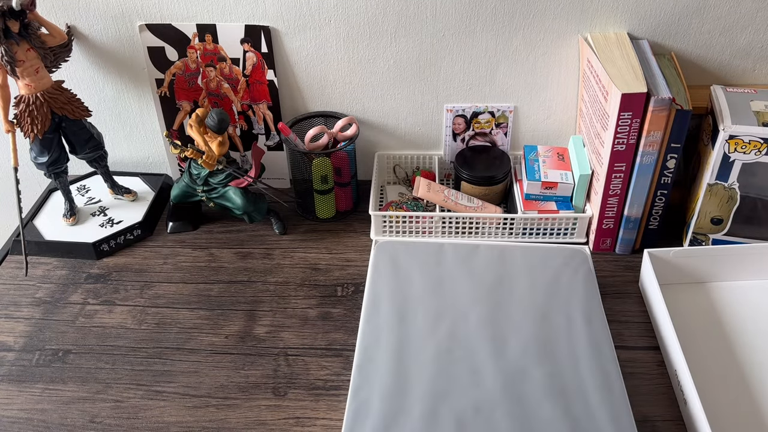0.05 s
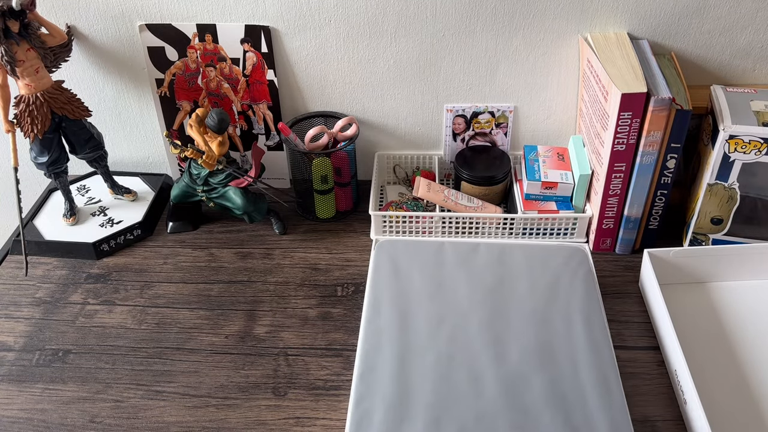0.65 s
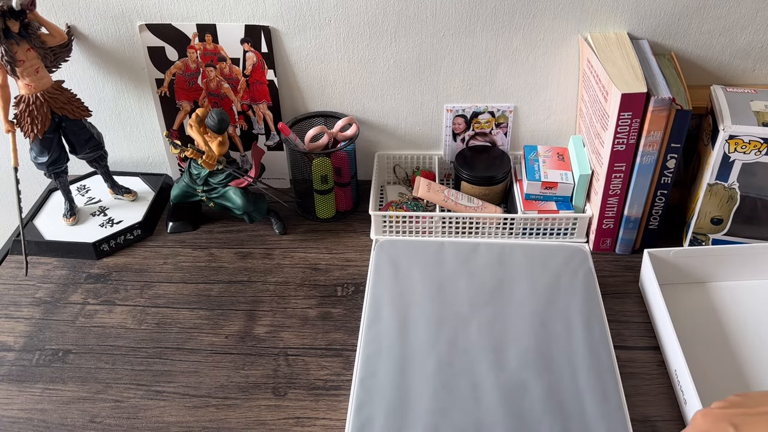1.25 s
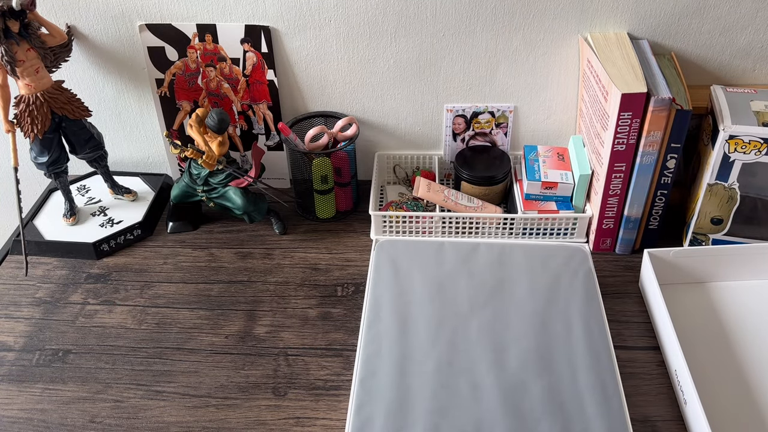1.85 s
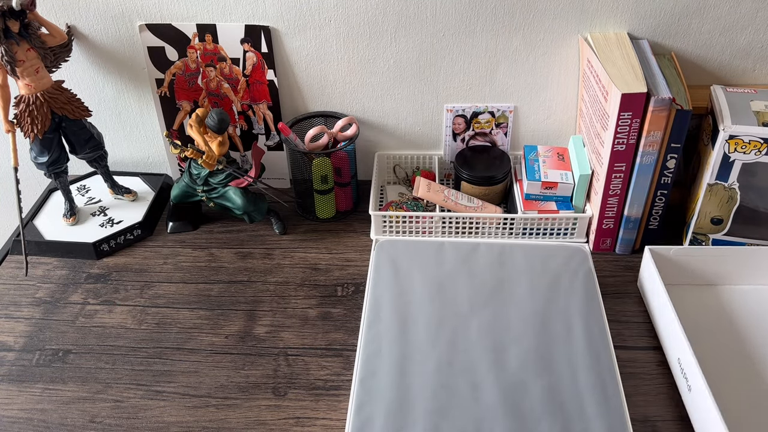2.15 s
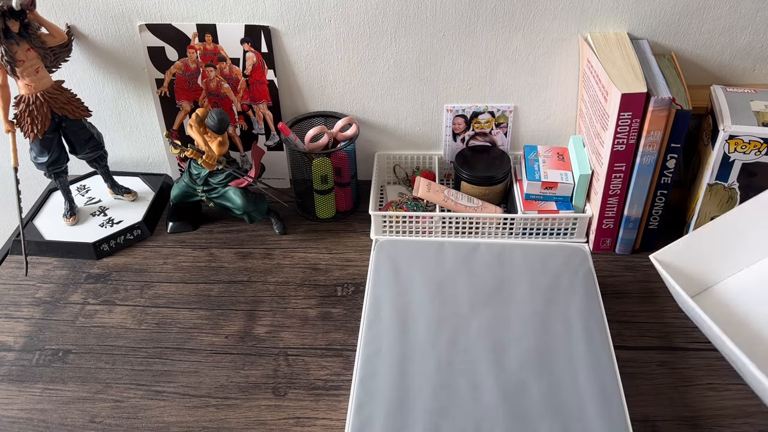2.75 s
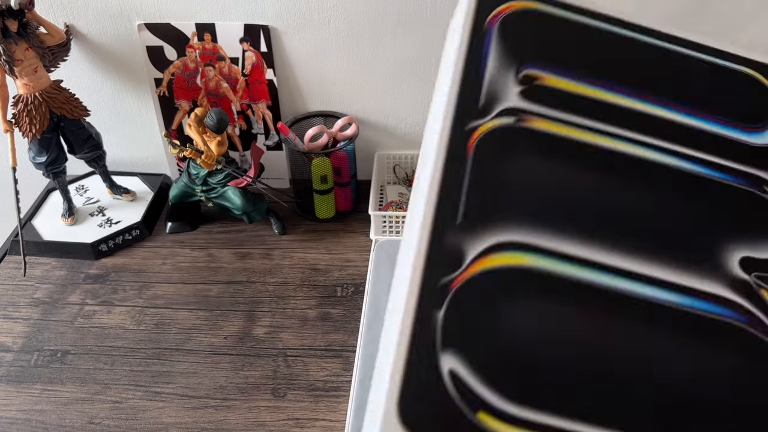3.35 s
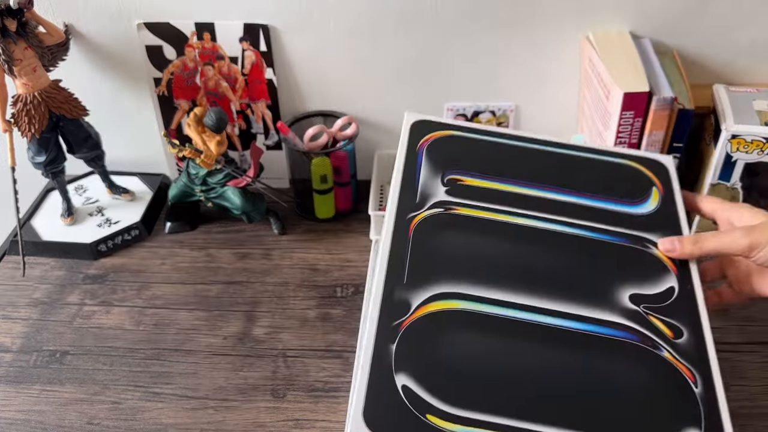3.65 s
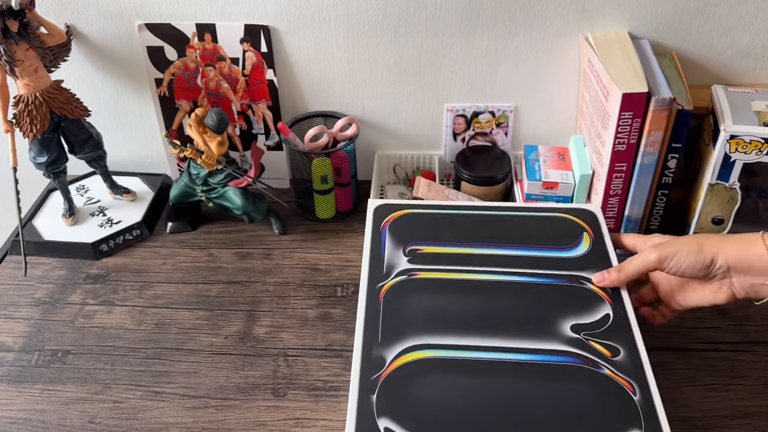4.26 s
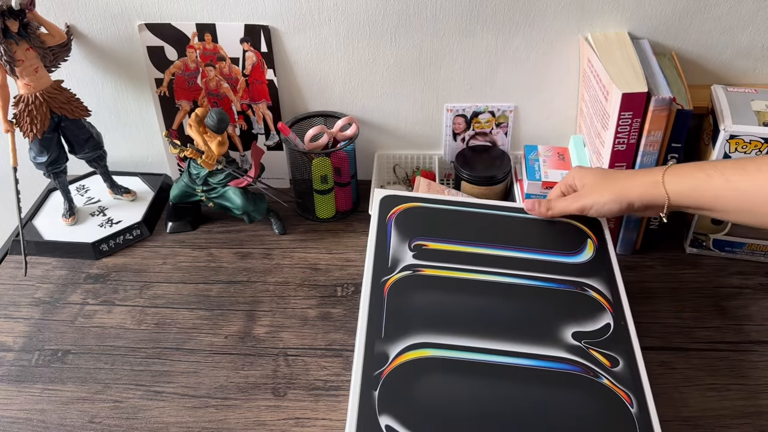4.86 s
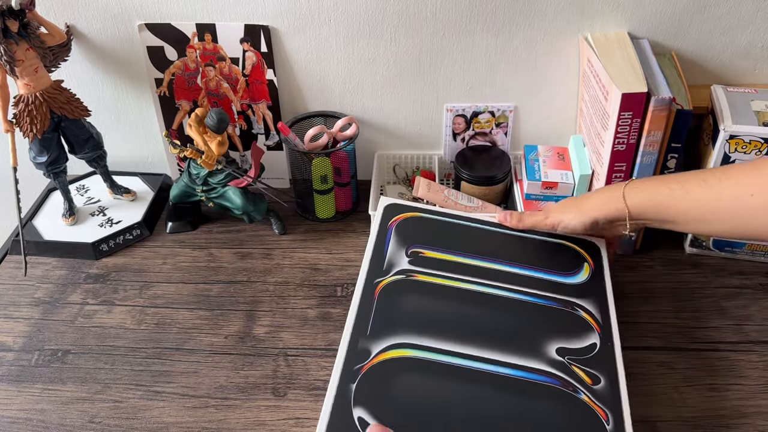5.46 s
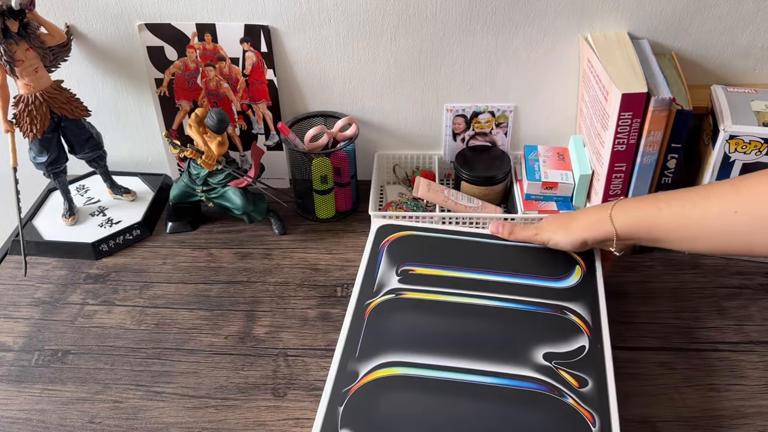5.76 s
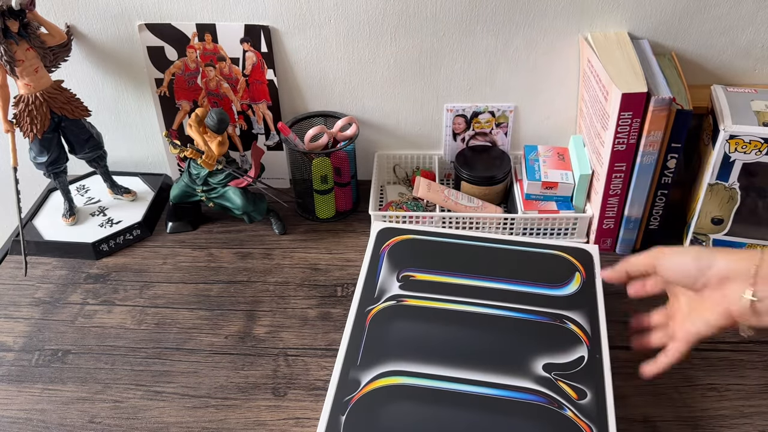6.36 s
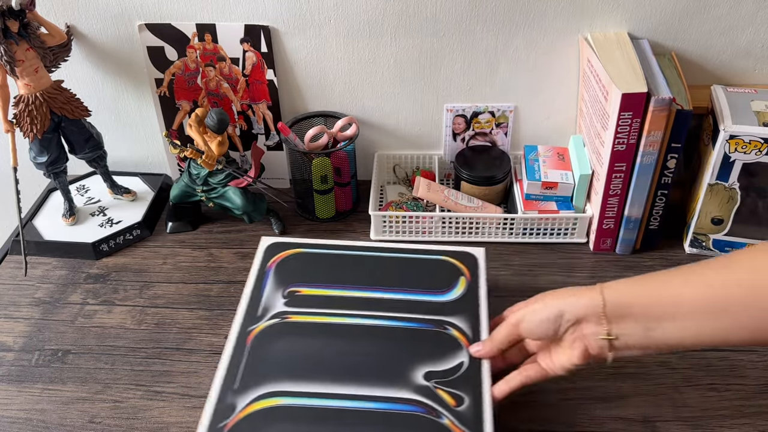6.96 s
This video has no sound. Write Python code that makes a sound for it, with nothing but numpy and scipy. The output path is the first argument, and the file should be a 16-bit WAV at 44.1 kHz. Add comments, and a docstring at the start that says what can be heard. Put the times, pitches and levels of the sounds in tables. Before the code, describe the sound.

Close to a phone microphone in a small, quiet room, a cardboard box is handled on a wooden desk. Soft finger scuffs and nail clicks come first, then hollow knocks as the lid is picked up and placed on the base. Card hisses against card as the lid slides down, ending in two dull thuds. The box then slides over the wood with a scrape, a low drone and crisp gritty ticks.

```python
"""A stiff cardboard box lid is picked up from a wooden desk, knocked, and set on its base.
Every blow rings the hollow of the box, its panels and its rims; fingers rub, tap and click on the card.
The lid sinks with a hiss of rubbing card and escaping air, and seats with two thuds.
Then the box is pushed across the desk, scraping and droning, with grit ticking under it.
All of it is close to a phone in a small room."""
import sys
import numpy as np
from scipy import signal
from scipy.fft import rfft, irfft, next_fast_len
from scipy.io import wavfile
from scipy.ndimage import uniform_filter1d

SR = 44100
rng = np.random.default_rng(int(sys.argv[2]) if len(sys.argv) > 2 else 0)


def unload_audio(sound):
    """Save the sound as a 16-bit wav file, at the path given as the first command line argument."""
    columns = np.transpose(np.atleast_2d(sound))
    # keep every value between -1 and 1, then stretch to whole-number steps
    steps = np.round(np.clip(columns, -1, 1) * 32767)
    wavfile.write(sys.argv[1], SR, steps.astype(np.int16))


N = 313048
TIME_S = np.arange(N) / SR
RING_S = np.arange(SR // 2) / SR

# Steady hiss. Each row: frequency in Hz, left gain in dB, right gain in dB.
ROOM_HISS = [(860, -21, -57), (1390, -7.5, -37), (1747, 3, -52.5), (1915, 5.5, -17.5), (2100, 5.5, -38),
             (2574, -10.5, -33), (3350, -16, -45.5), (4600, -14, -23.5), (5130, -28, -41.5),
             (8500, -26.5, -44), (10800, -76, -48)]
# Finger scuffs. Each row: start in seconds, length in seconds, hiss in dB, body in dB.
RUBS = [(0.154, 0.085, -52.5, -71), (0.274, 0.084, -62, -64), (0.368, 0.055, -55.5, -85),
        (0.454, 0.23, -68, -60), (0.663, 0.048, -50, -65), (0.729, 0.098, -70, -64),
        (2.482, 0.071, -56, -70), (2.565, 0.051, -65, -59), (2.628, 0.11, -59, -74),
        (2.752, 0.05, -59, -69), (4.38, 0.036, -53.5, -71), (4.582, 0.027, -63, -66.5),
        (4.848, .1, -57.5, -71), (5.076, 0.036, -62, -60), (5.999, 0.15, -71, -60.5),
        (6.4, 0.18, -69.5, -64.5)]
# Nail clicks. Each row: start in seconds, level in dB, pitch in Hz.
NAIL_SNAPS = [(0.2202, -54.5, 4230), (0.2207, -56, 9100), (0.4515, -53.5, 1550), (0.4928, -55.5, 1690),
              (2.1195, -72, 4900), (3.812, -58, 3120)]
# Finger taps. Each row: start in seconds, relative strength, hardness and tick in dB, panel pitch in Hz.
FINGER_TAPS = [(0.258, -53, 4, -71, 293), (0.454, -50.5, -7.5, -53, 260), (0.493, -55.5, 0, -53.5, 447),
               (0.548, -54.5, -6, -58.5, 354), (0.631, -57.5, -11, -64, 557), (1.240, -61, 5.5, -59.5, 613),
               (1.495, -69, -1, -59, 460), (2.556, -55, 6, -62, 570), (2.77, -58, 6, -62, 575),
               (2.937, -57.5, 16.5, -53.5, 596), (2.963, -53, 4, -80, 594), (3.477, -50.5, -3.5, -61, 295),
               (3.559, -66.5, 12, -60, 330), (3.748, -51, -1.5, -56.5, 640), (3.899, -64.5, -6.5, -67, 433),
               (4.339, -51.5, 0.5, -65, 464), (5.184, -48, -1, -83, 448), (5.251, -51, 1, -55.5, 392),
               (6.117, -53, 2.5, -56.5, 550)]
# Box and desk-top modes. Each row: frequency in Hz, relative level in dB, t60 in seconds.
BOX_MODES = [(96.7, -12.5, 0.53), (127.5, -11, 0.6), (141.1, 0.5, 0.21), (171.7, -3.5, 0.25),
             (214, 0.5, 0.12), (272.3, 0, 0.086), (327.2, 0, 0.16), (378.5, -2, 0.13), (424.6, -1, 0.095),
             (465.5, -13, 0.22), (501, -2.5, 0.14), (550.4, -7, 0.26), (644, -15, 0.087), (738, 4.5, 0.047),
             (836, 0.5, 0.1), (988, 1.5, 0.11), (1099, 10, 0.018), (1293, 3, 0.058), (1448, 2.5, 0.017),
             (1602, -2.5, 0.086), (2000, 1, 0.059), (2060, -1.5, 0.14)]
DESK_MODES = [(63, -12, 0.3), (82.3, -11, 0.37), (103, -20, 0.14)]
# Bumps on the desk. Each row: start in seconds, level in dB.
DESK_BUMPS = [(0.469, -62), (0.561, -53), (0.63, -53), (.70, -59), (2.189, -55), (2.412, -49), (2.711, -57),
              (3.49, -52), (3.985, -48)]
# Lid on desk or base. Each row: start in seconds, relative levels of hollow, panel, rim and tick in dB,
# pitches of hollow, panel and snap in Hz.
LID_KNOCKS = [(2.143, -29.5, -30.5, -40, -48.5, 169, 405, 650),
              (2.407, -40.5, -43, -41.5, -47.5, 123, 248, 2590),
              (3.0822, -63, -56, -33, -42.5, 135, 486, 6800),
              (3.0875, -39.5, -28, -34, -34.5, 211, 268, 805), (3.977, -35, -32, -42, -50.5, 134, 466, 586),
              (4.131, -37.5, -29, -45, -51.5, 146, 430, 480), (5.406, -43, -34, -41, -52, 175, 416, 450),
              (5.429, -37, -27, -37.5, -68, 172, 388, 1060), (5.507, -46.5, -46.5, -58, -82, 195, 356, 494),
              (5.931, -27.5, -30.5, -48, -46.5, 137, 349.5, 400),
              (5.985, -48, -46, -45, -47.5, 152, 497, 1040)]
# Lid moves: landing, sinking, pressed home. Each row: time in seconds, relative hiss and body in dB.
LID_MOVES = [
    [(3.98, -44, -63), (4.03, -69, -58.5), (4.09, -63.5, -54.5), (4.128, -64, -59.5), (4.158, -68, -69),
     (4.212, -99, -58.5), (4.33, -98, -52.5)],
    [(4.34, -73, -60), (4.374, -65, -51), (4.396, -63, -64), (4.552, -78.5, -76), (4.594, -69.5, -77.5),
     (4.83, -71, -64.5), (4.858, -68.5, -73.5), (5.168, -70, -55.5), (5.36, -76, -53)],
    [(5.37, -72, -28), (5.386, -57, -35), (5.416, -42, -54), (5.478, -65.5, -62), (5.71, -64.5, -60),
     (5.894, -64, -53), (5.926, -49, -57), (5.972, -58, -50), (5.99, -60, -55)],
]
# Grains under the box. Each row: start in seconds, peak in dB.
GRIT_TICKS = [(6.6704, -25.5), (6.7088, -31), (6.794, -25), (6.821, -20.5), (6.8388, -22), (6.8567, -20.5),
              (6.863, -20), (6.873, -20), (6.9359, -19)]
# Room decay. Each row: frequency in Hz, t60 in seconds.
ROOM_DECAY = [(100, 0.47), (400, 0.27), (1500, 0.29), (6000, 0.28), (14000, 0.21)]

# Spectra. Each row: frequency in Hz, gain in dB.
RUMBLE_EQ = [(20, -17), (35, -36.5), (52, 0.5), (75, -3), (110, -5.5), (160, -15), (460, -22), (950, -37),
             (2000, -15), (3200, -39), (5600, -43), (9000, -43), (16000, -42.5)]
RUB_HISS_EQ = [(500, 0.5), (1100, -5.5), (2000, -4), (3500, -7.5), (5500, -7.5), (8300, -3.5), (10000, -5),
               (14500, -8), (16000, 2.5)]
RUB_BODY_EQ = [(50, -24), (130, 6), (250, -1.5), (420, -1), (650, -18.5), (1200, -13.5), (2200, -49.5)]
DRAG_EQ = [(40, -32), (100, -1), (160, 7), (220, -3), (400, 4), (720, -6), (900, -18.5), (1400, -19),
           (2600, -33.5), (8000, -50)]
TICK_EQ = [(1200, -13.5), (2700, 6.5), (4200, 9.5), (5500, 0.5), (7800, 0.5), (10000, 4), (15000, -2.5)]
CRUNCH_EQ = [(250, -25.5), (600, 3.0), (820, -4.5), (1300, -3), (2400, -16.5), (4500, -35.5)]
RADIATION_EQ = [(30, -36), (70, -6.5), (120, -1)]  # a small box radiates little deep bass
SINK_HISS_EQ = [(500, -10), (780, -2), (950, 5), (1150, -0.5), (1500, 7), (2400, 1), (5000, 1.5),
                (7500, -0.5), (10000, 5), (13000, 2), (16000, 6.5)]
SINK_BODY_EQ = [(60, -29.5), (130, 0.5), (250, -7), (420, -1), (550, -6), (720, -17.5), (1120, -21),
                (2200, -35)]
SCRATCH_EQ = [(2000, -21), (4300, -6), (6000, -3), (8500, 7), (15000, -5.5)]
AIR_EQ = [(400, -17), (750, -7), (1100, 1), (1500, -8), (2400, -14), (6000, -24)]
SCRAPE_EQ = [(400, 2), (800, -1.5), (1600, 3), (2800, 0.5), (5200, -4), (8300, -4), (10000, 2),
             (14500, -3.5), (16000, -0.5)]
DRONE_EQ = [(50, -53), (100, -13), (150, 1.5), (230, -10.5), (350, 4), (450, -5.5), (600, -15), (1000, -35)]
GRIT_EQ = [(1200, -30), (2800, 0.5), (5000, -6.5), (8800, 4.5), (11000, -2), (15000, -5)]
REVERB_EQ = [(100, -8.5), (350, -2.5), (900, 6.5), (3000, -1.5), (9000, -5)]
MIC_EQ = [(9000, 1.5), (10300, -3), (11400, -24), (12500, -0.5), (14000, -4.5)]


def undb(db):
    """Decibels to gain."""
    return 10 ** (np.asarray(db) / 20)


def unit(x):
    """Scale to rms 1."""
    return x / np.sqrt(np.mean(x ** 2))


def fade(t60_s):
    """Exponential decay."""
    return np.exp(-np.log(1000) * RING_S / t60_s)


def rise(tau_s):
    """Exponential onset."""
    return 1 - np.exp(-RING_S / tau_s)


def strike(x, db):
    """Set the rms of the first 25 ms."""
    return x * undb(db) / np.sqrt(np.mean(x[..., RING_S < .025] ** 2))


def add(out, start_s, x):
    """Mix x in at start_s."""
    i = int(start_s * SR)
    out[:, i:i + x.shape[-1]] += x[:, :N - i]


def colour(x, eq):
    """Minimum-phase filter through (Hz, dB) points."""
    hz, db = np.transpose(eq)
    size = 2 * next_fast_len(x.shape[-1] // 2 + 2048)
    bins_hz = np.arange(size // 2 + 1) * SR / size
    gain_db = np.interp(np.log(bins_hz + 1), np.log(hz), db)
    cepstrum = irfft(gain_db * np.log(10) / 20)
    cepstrum[1:size // 2] *= 2
    cepstrum[size // 2 + 1:] = 0
    return irfft(rfft(x, size) * np.exp(rfft(cepstrum)), size)[..., :x.shape[-1]]


def stereo_noise(split_hz, left_db=0, size=len(RING_S), gain=1):
    """Noise whose channels share the bass and the very top, and differ in between."""
    hz = np.arange(size // 2 + 1) * SR / size
    apart = hz / (hz + split_hz) / (1 + (hz / 7500) ** 8)
    spectra = rfft(rng.standard_normal((3, size)) * gain)
    pair = irfft(spectra[0] * np.sqrt(1 - apart) + spectra[1:] * np.sqrt(apart), size)
    return pair * undb(np.array([[left_db], [-left_db]]) / 2)


def walk(rate_hz):
    """Random drift, rms 1."""
    hold = int(SR / rate_hz)
    steps = np.repeat(rng.standard_normal(N // hold + 1), hold)
    return unit(uniform_filter1d(steps, hold)[:N])


def background(rumble_db=-65, hiss_db=-65, lag_s=0.00031):
    """Low room rumble, and a steady hiss from the left that reaches the right later."""
    rumble = colour(stereo_noise(split_hz=1000, left_db=1, size=N), RUMBLE_EQ)
    source = rng.standard_normal(N)
    left = colour(source, [(hz, db) for hz, db, _ in ROOM_HISS])
    right = colour(source, [(hz, db) for hz, _, db in ROOM_HISS])
    hiss = np.array([left, np.interp(TIME_S - lag_s, TIME_S, right)])
    return unit(rumble) * undb(rumble_db + .5 * walk(0.99)) + unit(hiss) * undb(hiss_db)


def friction(eq, grain_db, flutter_db, flutter_hz, split_hz, left_db=0):
    """Fibres catch and let go, a few much harder than the rest, under uneven pressure."""
    catches = np.minimum(rng.exponential(size=N // 16 + 1), 6)
    grain = undb(grain_db * np.repeat(catches, 16)[:N])
    slips = stereo_noise(split_hz, left_db, size=N, gain=grain)
    return unit(colour(slips, eq)) * undb(flutter_db * walk(flutter_hz))


def scuff(start_s, length_s, attack_s=0.021, release_s=0.021):
    """Envelope of one short movement: attack, hold, release."""
    attack = np.clip((TIME_S - start_s) / attack_s, 0, 1)
    return attack * np.exp(-np.maximum(TIME_S - start_s - length_s, 0) / release_s)


def rubbing(drag_db=-39, drag_peak_s=2.276, drag_width_s=0.062):
    """Skin hisses over card; the lid's edge chatters lower on the desk as it tips up."""
    hiss = friction(RUB_HISS_EQ, grain_db=1, flutter_db=2.5, flutter_hz=24, split_hz=970, left_db=0.5)
    body = friction(RUB_BODY_EQ, grain_db=1.5, flutter_db=2.5, flutter_hz=76,
                    split_hz=1400, left_db=-2.5)
    chatter = friction(DRAG_EQ, grain_db=3, flutter_db=3, flutter_hz=70, split_hz=1400, left_db=-1.5)
    strokes = sum(scuff(start_s, length_s) * (hiss * undb(hiss_db) + body * undb(body_db))
                  for start_s, length_s, hiss_db, body_db in RUBS)
    drag = np.exp(-((TIME_S - drag_peak_s) / drag_width_s) ** 2)
    return strokes + chatter * undb(drag_db) * drag


def snap(db, hz):
    """A hard point hits card: a short burst around one pitch."""
    burst = stereo_noise(split_hz=2900) * (fade(0.011) + 0.062 * fade(0.31)) * rise(0.0011)
    peak_eq = [(hz / 3, -32), (hz / 1.45, -12), (hz, 0), (hz * 1.45, -12), (hz * 3, -25), (hz * 8, -52)]
    return strike(colour(burst, peak_eq), db)


def nail_snaps():
    """Nails click on the card."""
    out = np.zeros((2, N))
    for start_s, db, hz in NAIL_SNAPS:
        add(out, start_s, snap(db, hz))
    return out


def favour(pitch_hz, log_width, db):
    """Boost per mode in dB: strike point and grip pick out the modes near one pitch."""
    return db * np.exp(-(np.log(np.array(BOX_MODES)[:, 0] / pitch_hz) / log_width) ** 2)


def box_ring(lo_hz, hi_hz, rise_s, early_t60_s, late_gain, boost_db=0):
    """Box modes in one band swell, lose most energy to hand and desk, and ring on faintly."""
    hz, db, t60_s = np.transpose(BOX_MODES)
    shared, side, detune, uneven = rng.standard_normal((len(BOX_MODES), 4)).T
    apart = np.minimum((hz / 640) ** 2, 1)  # high modes differ more between channels
    gain = undb(db + boost_db + 2 * uneven)
    out = 0
    for k in np.flatnonzero((hz > lo_hz) & (hz < hi_hz)):
        phase = 0.64 * shared[k] + apart[k] * side[k] * np.array([[1], [-1]])
        wave = np.sin(2 * np.pi * hz[k] * (1 + 0.024 * detune[k]) * RING_S + phase)
        out = out + gain[k] * fade(t60_s[k]) * wave
    return out * rise(rise_s) * (fade(early_t60_s) + late_gain)


def blow(hollow_db, panel_db, rim_db, tick_db, hollow_hz, panel_hz):
    """Contact tick, crunch of card, ringing rims and panels, then the slower boom of the hollow."""
    hollow = box_ring(0, 245, rise_s=0.0071, early_t60_s=0.16, late_gain=0.13,
                      boost_db=favour(hollow_hz, log_width=0.077, db=5.5))
    panel = box_ring(245, 700, rise_s=0.0041, early_t60_s=0.062, late_gain=0.23,
                     boost_db=favour(panel_hz, log_width=0.14, db=11))
    rim = box_ring(700, 3000, rise_s=0.0024, early_t60_s=0.012, late_gain=0.35)
    crush = stereo_noise(split_hz=700) * (fade(.025) + .22 * fade(.16))
    crunch = colour(crush, CRUNCH_EQ)
    contact = stereo_noise(split_hz=1400, left_db=2) * (fade(0.011) + 0.19 * fade(0.31))
    tick = colour(contact * rise(0.0011), TICK_EQ)
    shell = strike(panel, panel_db) + strike(rim, rim_db - 4.5) + strike(crunch, rim_db - 6)
    shell = shell * undb([[-0.5], [0.5]])  # slightly right
    return strike(hollow, hollow_db) + shell + strike(tick, tick_db - 5.5)


def finger_taps(hollow_hz=158.4):
    """Fingers shift their grip: soft pads sound the hollow, hard tips the rim."""
    out = np.zeros((2, N))
    for start_s, db, hardness_db, tick_db, panel_hz in FINGER_TAPS:
        hollow_db = db - 6 - hardness_db
        rim_db = db - 4 + hardness_db
        add(out, start_s, blow(hollow_db, db, rim_db, tick_db, hollow_hz, panel_hz))
    return out


def desk_bumps(rise_s=0.0059):
    """Soft bumps of arm or box ring only the lowest desk modes."""
    out = np.zeros((2, N))
    ring = sum(undb(db) * fade(t60_s) * np.sin(2 * np.pi * hz * RING_S) for hz, db, t60_s in DESK_MODES)
    for start_s, db in DESK_BUMPS:
        add(out, start_s, strike(ring * rise(rise_s), db)[None])
    return out


def lid_knocks(rebound_s=.017, rebound_db=-11):
    """A lid corner lands with a snap, the box rings, and the lid drops back once."""
    out = np.zeros((2, N))
    for start_s, hollow_db, panel_db, rim_db, tick_db, hollow_hz, panel_hz, snap_hz in LID_KNOCKS:
        hit = (hollow_db, panel_db, rim_db, tick_db, hollow_hz, panel_hz)
        add(out, start_s, blow(*hit) + snap(rim_db - 5.5, snap_hz))
        add(out, start_s + rebound_s, undb(rebound_db) * blow(*hit))
    return out


def move_gain(times_s, db, ramp_s=0.15):
    """Envelope of one lid move: dB breakpoints, ramped in and out."""
    inside_s = np.minimum(TIME_S - times_s[0], times_s[-1] + 0.047 - TIME_S)
    return np.clip(inside_s / ramp_s, 0, 1) * undb(np.interp(TIME_S, times_s, db))


def lid_sinking(air_db=-61):
    """Card scratches on card in surges and drives the panels; the final press forces air out."""
    hiss = friction(SINK_HISS_EQ, grain_db=2.5, flutter_db=-3.5, flutter_hz=51, split_hz=1300)
    scratch = friction(SCRATCH_EQ, grain_db=0, flutter_db=4, flutter_hz=14, split_hz=2700, left_db=6)
    body = friction(SINK_BODY_EQ, grain_db=1, flutter_db=1, flutter_hz=41, split_hz=1900, left_db=-0.5)
    air = friction(AIR_EQ, grain_db=-1, flutter_db=3, flutter_hz=25, split_hz=1400, left_db=-2.5)
    contact = undb(8) * hiss + scratch
    out = air * undb(air_db) * scuff(start_s=5.43, length_s=0.58)
    for move in LID_MOVES:
        times_s, hiss_db, body_db = np.transpose(move)
        out += contact * move_gain(times_s, hiss_db) + body * move_gain(times_s, body_db + 1)
    return out


def box_push(start_s=6.554, speed_up_s=0.35, scrape_db_per_s=-5.5, drone_db_per_s=27):
    """The box speeds up, then glides, scraping on wood and dust; its hollow drone takes over."""
    scrape = friction(SCRAPE_EQ, grain_db=0.6, flutter_db=1, flutter_hz=120, split_hz=1100, left_db=-0.5)
    dust = friction(GRIT_EQ, grain_db=1, flutter_db=7, flutter_hz=45, split_hz=6000, left_db=8.5)
    drone = friction(DRONE_EQ, grain_db=1, flutter_db=1, flutter_hz=45, split_hz=3000)
    speed = np.clip((TIME_S - start_s) / speed_up_s, 0, 1)
    glide_s = TIME_S - start_s - speed_up_s
    scrape_gain = undb(-43 + scrape_db_per_s * glide_s)
    drone_gain = undb(-46.5 + drone_db_per_s * glide_s)
    return speed * ((scrape + undb(-11) * dust) * scrape_gain + drone * drone_gain)


def grit(crack_t60_s=0.0025, tail_db=-28):
    """Grains under the sliding box give way with a very short crack."""
    out = np.zeros((2, N))
    envelope = fade(crack_t60_s) + undb(tail_db) * fade(0.45)
    for start_s, peak_db in GRIT_TICKS:
        crack = colour(stereo_noise(split_hz=11000, left_db=3.5) * envelope, GRIT_EQ)
        add(out, start_s, crack * undb(peak_db) / np.abs(crack.mean(axis=0)).max())
    return out


def room(x, wet_db, gap_s):
    """Diffuse reflections of a small room; treble dies first."""
    hz, t60_s = np.transpose(ROOM_DECAY)
    edges_hz = np.geomspace(60, 16000, 9)
    noise = stereo_noise(split_hz=700)
    tail = 0
    for lo, hi in zip(edges_hz, edges_hz[1:]):
        band = signal.sosfilt(signal.butter(2, [lo, hi], "band", fs=SR, output="sos"), noise)
        tail = tail + band * fade(np.interp(np.log(lo * hi) / 2, np.log(hz), t60_s))
    tail = tail * np.clip(RING_S / gap_s - 1, 0, 1)
    tail = colour(unit(tail) / np.sqrt(len(RING_S)), REVERB_EQ)
    return undb(wet_db) * signal.fftconvolve(x, tail, axes=1)[:, :N]


def scene():
    """Blows, friction and desk bumps in the room."""
    blows = colour(lid_knocks() + finger_taps(), RADIATION_EQ) + nail_snaps()
    slides = rubbing() + lid_sinking() + box_push() + grit()
    bumps = desk_bumps()
    reverb = room(blows, wet_db=-8.5, gap_s=0.003) + room(slides, wet_db=-9.5, gap_s=0.0066)
    return blows + slides + bumps + reverb + background()


def record(dry, port_hz=11400, port_q=3.14, top_hz=15900):
    """The phone colours and cuts the top; a port resonance turns the right microphone's phase."""
    left, right = colour(dry, MIC_EQ)
    right = 2 * signal.lfilter(*signal.iirnotch(port_hz, port_q, fs=SR), right) - right  # all-pass
    lowpass = signal.ellip(10, .2, 70, top_hz, fs=SR, output="sos")
    return signal.sosfilt(lowpass, np.array([left, right]))


dry = scene()
out = record(dry)
unload_audio(out)
```